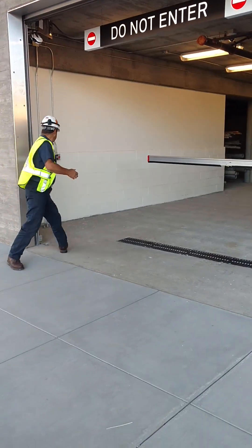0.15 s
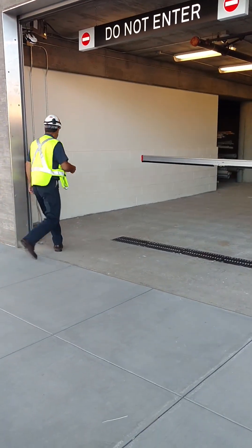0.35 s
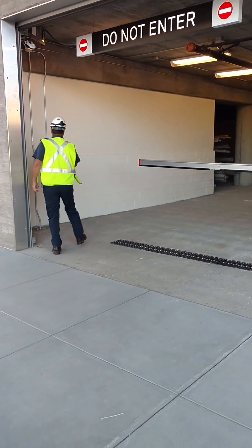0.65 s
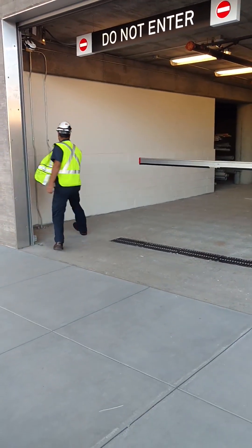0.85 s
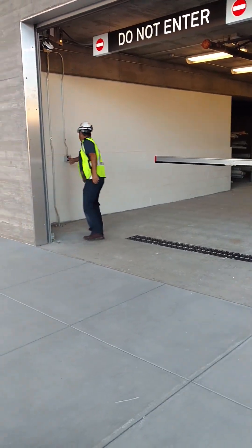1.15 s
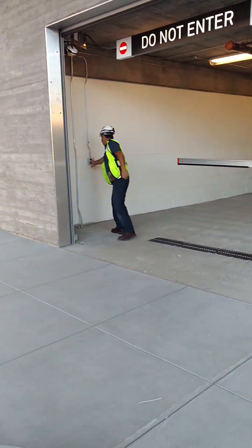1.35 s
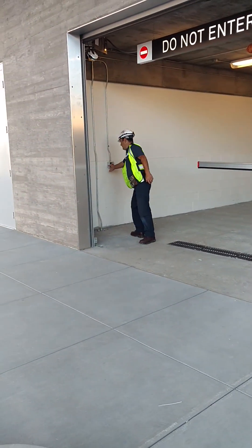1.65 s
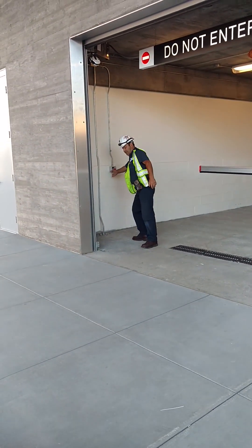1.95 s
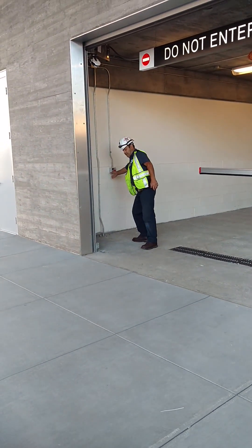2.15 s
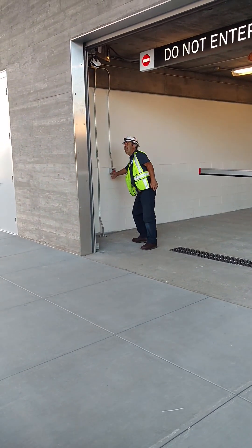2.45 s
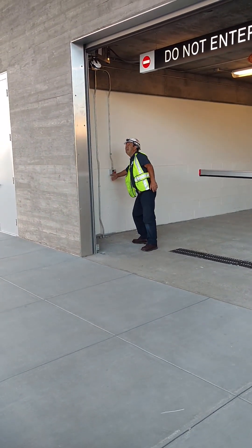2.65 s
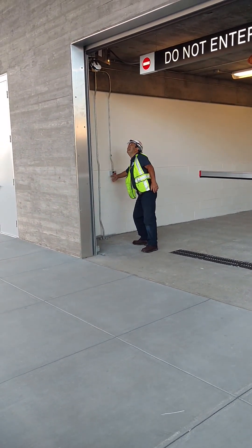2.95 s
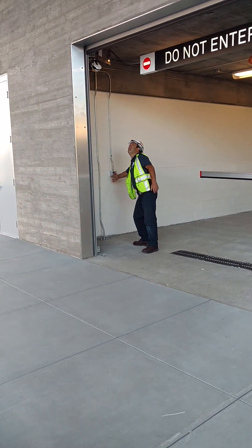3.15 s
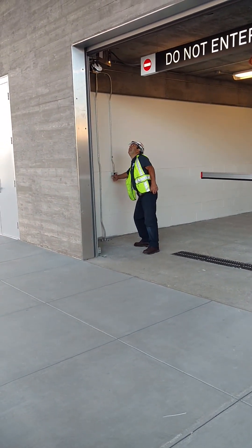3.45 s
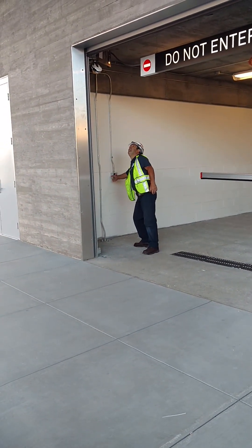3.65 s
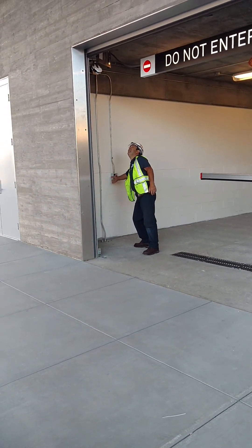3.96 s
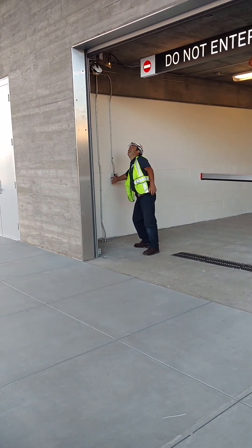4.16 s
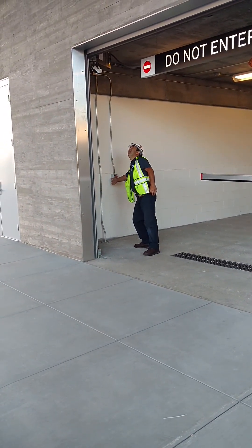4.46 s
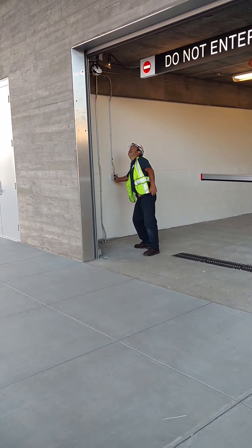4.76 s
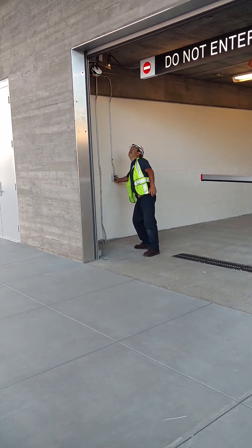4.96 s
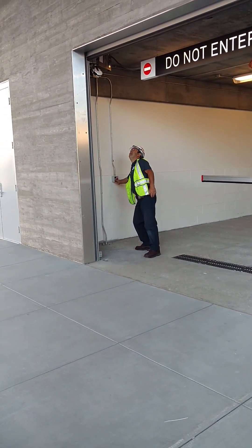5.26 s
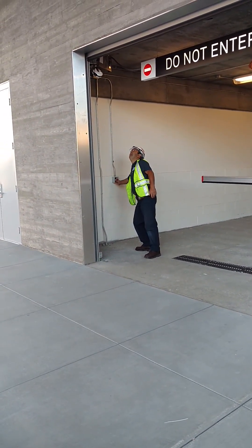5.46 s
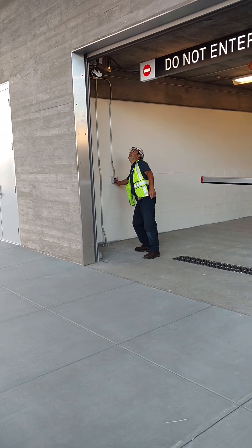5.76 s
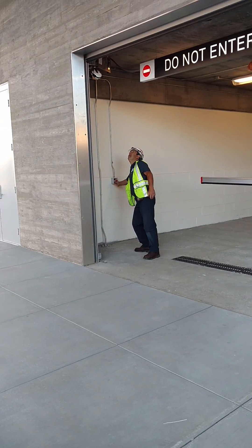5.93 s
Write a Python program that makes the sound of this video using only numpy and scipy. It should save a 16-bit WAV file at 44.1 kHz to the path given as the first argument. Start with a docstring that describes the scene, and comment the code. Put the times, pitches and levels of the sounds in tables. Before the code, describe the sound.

Continuous motor hum and dull rushing roar fill a hard-walled garage entrance. A few light ticks of air give way to a loud run of hissing puffs, clinking steel and uneven knocks, plus faint squeaks. The drone holds alone briefly, then one abrupt clack with quick clattering and a burst of air. A buzzy engine tone rises near the end. Wide stereo pickup; the background dips after loud bursts.

```python
"""At the mouth of a concrete garage a motor hums steadily over the broad roar of machinery, and a second engine
wanders in speed. Air hisses out in sharp bursts, metal knocks, clinks and squeals thinly.
Motor and engine are sums of harmonics, roar and air are shaped noise, struck metal rings in decaying modes and
squeals are noise through narrow resonances. Two close capsules are steered into a wide pair."""
import sys
import numpy as np
from scipy import signal
from scipy.fft import rfft, irfft
from scipy.io import wavfile
from scipy.ndimage import uniform_filter1d

SR = 44100
rng = np.random.default_rng(int(sys.argv[2]) if len(sys.argv) > 2 else 0)


def magnitude_from_level(level_db):
    """Linear magnitude for a level in decibels (20 dB per decade)."""
    exponent = np.asarray(level_db, float) / 20
    return 10 ** exponent


def put_to_file(sound):
    """Save the sound as 16-bit audio at rate SR, in the file named by the first command-line argument."""
    columns = np.atleast_2d(sound).T  # one column per channel
    safe = np.clip(columns, -1, 1)
    whole_steps = np.round(safe * 32767)
    wavfile.write(sys.argv[1], SR, whole_steps.astype(np.int16))


N = 268682
T = np.arange(N) / SR   # time [s]
HZ = np.maximum(np.arange(N // 2 + 1) * SR / N, 10)   # pitch of each spectral bin, floored for the log axis
MOTOR_TURN_HZ = 15.165
# difference of the two capsules in a reverberant field: (frequency [Hz], side over mid [dB])
CAPSULE_SIDE = [(60, -32), (125, -30), (250, -25), (350, -11), (520, -12), (1000, -11), (1600, 0),
                (2500, 0), (16000, -2.5)]


def rms_one(x):
    """Normalise the mean power: scale to rms 1."""
    return x / np.sqrt(np.mean(x ** 2) + 1e-20)


def in_time(rows):
    """Linear interpolation: the columns of a time curve at every sample."""
    s, *columns = np.transpose(rows)
    return [np.interp(T, s, c) for c in columns]


def at_hz(points, hz):
    """Interpolation on a logarithmic frequency axis."""
    freqs, levels = np.array(points).T
    return np.interp(np.log(hz), np.log(freqs), levels)


def drift(rate_hz):
    """Low-pass random process: noise through two equal poles at rate_hz, with spread 1."""
    hop = 40   # computed at every 40th sample
    r = np.exp(-2 * np.pi * rate_hz * hop / SR)
    settle = 2000
    white = rng.standard_normal(N // hop + settle + 2)
    slow = rms_one(signal.lfilter([1], [1, -2 * r, r * r], white)[settle:])
    return np.interp(np.arange(N) / hop, np.arange(len(slow)), slow)


def coloured(spectrum):
    """Spectral shaping: two uncorrelated noises, mid and side, of one colour."""
    white = rfft(rng.standard_normal((2, N)))
    return rms_one(irfft(white * magnitude_from_level(at_hz(spectrum, HZ)), N))


def tone(hz, waver_db):
    """Interference of reflections: a sine wavers in phase and level, with unrelated phases in mid and side."""
    shake_rad = 0.0012 * hz * drift(3.26)   # grows with pitch
    phase = 2 * np.pi * (np.cumsum(hz + 0 * T) / SR + rng.random((2, 1))) + shake_rad
    return np.sqrt(2) * np.sin(phase) * magnitude_from_level(waver_db * drift(2.04))


def motor(roar_db):
    """Harmonics of steady rotation, with a fan tone, ride with the roar; the deep hum falls away for a while."""
    # steady multiples of the turning rate: (multiple), and their (level over the roar [dB])
    multiples, multiple_db = [9, 12, 13, 15, 17, 19, 24, 25, 26, 42, 46, 51, 109], [-17.5, -23, -19.5, -14, -16, -15, -25.5, -21, -21, -23,
                                                    -16, -35, -22]
    # gear tones that come and go: (time [s], 45th, 48th and 27th multiple over the roar [dB])
    gear_tones = [(0, -8, -11, -17), (.15, -20, -13, -11.5), (.6, -6.5, -9.5, -14), (.9, -25, -21, -10),
                  (1.6, -10, -19, -22), (1.95, -14, -32, -26), (2.55, -15.5, -7.5, -20),
                  (2.85, -24, -16, -14), (3.5, -13.5, -30, -19), (4.1, -8.5, -14, -23),
                  (4.6, -20, -18, -20), (6.09, -14.5, -18, -15)]
    # fan tone: (time [s], level over the roar [dB])
    fan_level = [(0, -6.5), (.7, -10), (1.1, -6), (1.65, -12.5), (2.2, -10), (3.3, -14), (4.1, -13),
                 (6.09, -10.5)]
    hum = 0
    for k, db in zip(multiples, multiple_db):
        hum = hum + magnitude_from_level(db) * tone(k * MOTOR_TURN_HZ, waver_db=3.5)
    for k, db in zip([45, 48, 27], in_time(gear_tones)):
        hum = hum + magnitude_from_level(db) * tone(k * MOTOR_TURN_HZ, waver_db=0)
    fade_s = 0.37
    fall = np.clip((T - 4.23) / fade_s, 0, 1)
    back = np.clip((T - 6.1) / fade_s, 0, 1)
    deep_db = -38.5 - 14 * (fall - back)
    deep = magnitude_from_level(deep_db) * tone(6 * MOTOR_TURN_HZ, waver_db=1.5)
    fan = magnitude_from_level(*in_time(fan_level)) * tone(263.6, waver_db=2.5)
    return magnitude_from_level(roar_db) * (hum + fan) + deep


def engine():
    """Harmonics of a varying firing rate: three multiples glide together and grow with the load."""
    # wandering speed: (time [s], firing rate [Hz])
    speed = [(0, 66), (.5, 65), (1, 63.1), (1.5, 62.4), (1.8, 61.8), (2.3, 61.5), (2.75, 56.5), (3.1, 57.5),
             (3.6, 59.2), (4.1, 64), (4.6, 68.1), (5.92, 68.4), (6.09, 71)]
    # load: (time [s], change at full share [dB])
    load = [(0, 0.5), (.6, -1), (1.1, -11), (1.5, 5), (1.9, 4.5), (2.9, -8.5), (3.55, 6), (3.85, -12),
            (4.45, -16), (4.75, 8), (5.08, 3), (5.3, 7.5), (5.85, 7.5), (6.09, -5)]
    # firing tone, 4th and 9th multiple: (level at zero load [dB]), and (share of the load shown, 0-1)
    base_db, load_share = [-49, -37.5, -40.5], [0.048, 0.29, 1]
    firing_hz, = in_time(speed)
    load_db, = in_time(load)
    swell_db = [np.interp(T, [3.7, 4.5], [0, 9]), 0, 0]   # the firing tone swells and stays
    out = 0
    for k, db, share, more_db in zip([1, 4, 9], base_db, load_share, swell_db):
        out = out + magnitude_from_level(db + share * load_db + more_db) * tone(k * firing_hz, waver_db=0.85)
    return out


def bursts():
    """Turbulent jet noise: each burst sputters, sets in sharply and decays exponentially in the concrete."""
    # bursts of air: (time [s], nominal peak [dB], lowest frequency [Hz], rise [s], decay by 60 dB [s])
    puffs = [(0.132, -33, 7050, .001, 0.69), (.1325, -35, 5800, .0005, .07), (.134, -29, 12800, .001, 0.1),
             (.226, -24, 12800, .004, .1), (.515, -40, 10500, 0.012, 0.48),
             (1.393, -26, 3420, 0.0022, 0.13), (1.653, -21, 4700, 0.0018, 0.33),
             (1.66, -17.5, 2600, 0.038, 1.1), (1.748, -14.5, 1690, 0.0026, 1.17),
             (1.793, -13, 2580, 0.005, 0.086), (1.962, -18.5, 2500, 0.026, 0.76),
             (2.07, -26, 4900, 0.018, 0.13), (2.165, -38, 6030, 0.0086, 0.057),
             (2.371, -25, 3480, .002, 0.22), (2.425, -30, 5900, 0.031, 1.5),
             (2.553, -27, 11000, .001, 0.05), (2.6, -32.5, 5000, 0.015, 1), (3.337, -38, 8000, .003, 0.3),
             (4.18, -37, 9000, 0.018, 0.34), (4.2627, -15, 4500, .0005, 0.098),
             (4.2627, -18, 11500, .0005, 0.067), (4.272, -18, 7500, .0005, 0.06),
             (4.2725, -14.5, 900, .0005, 0.37), (4.314, -17, 800, 0.023, 0.57),
             (4.32, -21, 10400, 0.028, 0.45), (4.76, -33, 11000, .002, 0.26),
             (4.75, -28.5, 4400, 0.013, 0.59)]
    # colour of the jet before the nozzle: (frequency [Hz], relative density [dB])
    air = [(700, -5), (1200, 14), (2000, 9.5), (3200, 5), (4500, 2.5), (6500, -2), (8000, -16.5),
           (10000, -15), (12500, -31.5), (14500, -33.5)]
    nozzle_bright = 0.43   # how far the nozzle lifts the treble, 0-1
    sputter = magnitude_from_level(0.6 * drift(30) + 2.2 * drift(700))
    jet = signal.lfilter(np.poly([nozzle_bright] * 3), [1], coloured(air) * sputter)
    out = np.zeros((2, N))
    for s, peak_db, low_hz, rise, t60 in puffs:
        i = round(s * SR)
        t = T[:min(N - i, SR)]
        shape = np.minimum(t / rise, 1) * magnitude_from_level(-60 * t / t60)
        cut = signal.butter(5, low_hz, "high", fs=SR, output="sos")
        puff = signal.sosfilt(cut, jet[:, i:i + len(t)])
        out[:, i:i + len(t)] += magnitude_from_level(peak_db) * shape * rms_one(puff) / 3   # noise peaks at about thrice its rms
    return out


def knocks():
    """Modal excitation: a contact of some milliseconds lets every mode swell, with fresh strength and phase."""
    # blows: (time [s], relative level [dB], weight of the low modes [dB], pitch ratio by the place struck [-])
    blows = [(1.716, -8.5, -21, 1.2), (1.803, -11, -23, 1.2), (1.916, 0, -18, 1), (2.076, -6.5, -10, 0.9),
             (2.209, -2.5, -11, 0.75), (2.222, -6, -7, 0.95), (2.37, -4.5, -27, 0.98),
             (2.72, -22.5, 8, 1.3), (2.805, -11, -32, 1.14), (4.269, -4, -3.5, 1.03), (4.292, -16, 2, 1.3),
             (4.319, -7, 3, 1), (4.335, -9, -1, 1.03), (4.349, -7.5, -1.5, 1.3), (4.37, -3, -1.5, .95),
             (4.398, -13, 6.5, 1.2)]
    # modes of the metal: (frequency at ratio 1 [Hz], relative level [dB], decay by 60 dB [s])
    modes = [(290, -3, .12), (430, -5, .1), (830, -8, .04), (1040, -1, .025), (1190, -7, .03),
             (1350, -10, .04), (1620, -14, .03), (1950, -10, .025)]
    contact = np.hanning(400)
    out = np.zeros((2, N))
    for hz, mode_db, t60 in modes:
        r = magnitude_from_level(-60 / (t60 * SR))
        for (s, db, low_db, pitch), (chance, *turns) in zip(blows, rng.random((len(blows), 3))):
            i = round(s * SR)
            w = 2 * np.pi * hz * pitch / SR
            start_phase = 2 * np.pi * np.array(turns)[:, None]
            swing = np.cos(w * np.arange(len(contact)) + start_phase)
            gain = magnitude_from_level(db + mode_db + low_db * (hz < 500) + 2.3 * (chance - 3.5))
            push = np.zeros((2, SR // 4))
            push[:, :len(contact)] = gain * 2 * contact / contact.sum() * swing
            out[:, i:i + SR // 4] += signal.lfilter([0, np.sin(w)], [1, -2 * r * np.cos(w), r * r], push)
    return out


def clinks():
    """Modal resonance: a few milliseconds of chatter ring the high modes of a small steel part."""
    # clinks: (time [s], strength of the chatter [dB])
    strikes = [(1.656, -21), (1.667, -29), (1.679, -27.5), (1.695, -25), (1.707, -25), (4.2722, -29)]
    # modes of the part: (frequency [Hz], relative level [dB], decay by 60 dB [s])
    modes = [(4700, -7, 0.062), (6700, -7, 0.063), (7500, -9, .04), (9160, -12, 0.055),
             (11550, -11.5, 0.046)]
    chatter, out = np.zeros((2, N)), 0
    for s, db in strikes:
        i, grit = round(s * SR), rng.standard_normal((2, 200))
        chatter[:, i:i + 200] += magnitude_from_level(db) * grit / 10
    for hz, db, t60 in modes:
        r, w = magnitude_from_level(-60 / (t60 * SR)), 2 * np.pi * hz / SR
        out = out + magnitude_from_level(db) * signal.lfilter([0, np.sin(w)], [1, -2 * r * np.cos(w), r * r], chatter)
    return out


def squeals():
    """Resonant filtering: stuttering friction noise passes twice through a narrow resonance."""
    # squeals and whistling hiss: (start [s], end [s], frequency [Hz], width of one pass [Hz], level [dB])
    cries = [(1.035, 1.284, 2140, 981.5, -36), (1.649, 1.83, 6600, 2268, -31),
             (1.757, 1.768, 6500, 620, -35), (1.804, 1.809, 4200, 700, -25), (2.348, 2.497, 9330, 420, -52),
             (2.555, 2.974, 2750, 350, -42), (2.555, 2.753, 3600, 350, -44.5), (2.594, 2.8, 9600, 400, -56),
             (2.925, 3.01, 9800, 432, -51.5), (3.352, 3.385, 9670, 400, -51),
             (4.19, 4.314, 6130, 200, -39.5), (4.733, 5.857, 6580, 518.4, -53.5),
             (5.165, 5.712, 7050, 1700, -50.5)]
    out, white = 0, rng.standard_normal((2, N))
    for start, end, hz, width_hz, db in cries:
        r = np.exp(-np.pi * width_hz / SR)
        resonance = [1, 0, -1, 1, -2 * r * np.cos(2 * np.pi * hz / SR), r * r]
        length = end - start
        fade_in = np.clip((T - start) / (0.055 * length), 0, 1)
        fade_out = np.clip((end - T) / (0.21 * length), 0, 1)
        stutter = magnitude_from_level(3.2 * drift(35))
        ringing = rms_one(signal.sosfilt([resonance, resonance], white))
        out = out + magnitude_from_level(db) * fade_in * fade_out * stutter * ringing
    return out


def roar():
    """Amplitude modulation: broad noise throbs with every turn of the motor; now and then its bass swells."""
    # colour: (frequency [Hz], relative density [dB])
    colour = [(45, -26.5), (70, -18), (120, -3.5), (200, -1.5), (270, 2), (400, -5.5), (650, -2.5),
              (1000, -5), (1600, -9), (2500, -15), (4000, -23), (6500, -29), (9000, -39.5), (12000, -51),
              (15000, -54)]
    # the bass builds up, then drops back: (time of the top [s], swell [dB], build-up [s])
    swells = [(1.6, 3.5, .8), (5.9, 5.5, 0.31)]
    turn = 2 * np.pi * MOTOR_TURN_HZ * T
    throb = 1 + 0.036 * np.sin(turn) + 0.021 * np.sin(3 * turn)
    spectrum = rfft(coloured(colour))
    bass = irfft(spectrum / (1 + (HZ / 380) ** 4), N)
    drop_s = 0.12
    bass_db = sum(np.interp(T, [s - rise, s, s + drop_s], [0, db, 0]) for s, db, rise in swells)
    return (irfft(spectrum, N) + bass * (magnitude_from_level(bass_db) - 1)) * throb * magnitude_from_level(0.5 * drift(6))


def scene():
    """Superposition: all sources add as mid and side of the field, then are dealt to the two capsules."""
    # slow swell of the roar: (time [s], level [dB])
    roar_level = [(0.0, -25), (0.6, -25), (0.8, -27), (1.6, -25), (3.0, -25), (4.2, -24), (5.0, -25.5),
                  (5.9, -26), (6.09, -29)]
    roar_db, = in_time(roar_level)
    field = magnitude_from_level(roar_db) * roar() + motor(roar_db) + engine() + bursts() + knocks() + clinks() + squeals()
    mid, side = rfft(field)
    # the deep hum comes along the line of the capsules, so one hears it later and weaker or stronger
    bass_lag_s, bass_tilt, bass_top_hz = 0.00016, 0.048, 124
    along = (bass_tilt - 1j * np.pi * HZ * bass_lag_s) / (1 + (HZ / bass_top_hz) ** 4)
    side = side * magnitude_from_level(at_hz(CAPSULE_SIDE, HZ)) + along * mid
    return irfft(np.array([mid + side, mid - side]), N)


def steer(pair):
    """Delay-and-subtract directivity: each side subtracts the other capsule; an equaliser restores the bass."""
    # unequal colour of the sides by the housing: (frequency [Hz], left over right [dB])
    balance = [(60, -6.5), (600, 1), (1400, 0), (2200, -2.5), (3500, 2), (7000, 0.5), (9600, 5),
               (11000, 0.5), (15000, 3)]
    gain, delay_samples = 0.72, 17
    lean = 0.12   # the right side subtracts a little more, the left a little less
    late = gain * np.exp(-2j * np.pi * HZ * delay_samples / SR)
    left, right = rfft(pair)
    wide = np.array([left - (1 - lean) * late * right, right - (1 + lean) * late * left])
    power = np.abs(1 - late) ** 2 + np.abs(1 + late) ** 2 * magnitude_from_level(2 * at_hz(CAPSULE_SIDE, HZ))
    housing = magnitude_from_level(at_hz(balance, HZ) * [[0.5], [-0.5]])
    treble_cut = 1 / (1 + (HZ / 14300) ** 60)
    return irfft(wide * housing * treble_cut / np.sqrt(power), N)


def gain_control(x):
    """Feed-forward compression: loud treble pulls the gain down quickly; it creeps back at a steady rate."""
    hears_above_hz, window_s = 1390, 0.047
    knee_db, share, release_db_per_s, attack_s = -33, 0.48, 8.5, 0.12
    bass_hz, bass_more = 464, 0.73   # below this pitch the gain is pulled further, by this share
    heard = signal.sosfilt(signal.butter(2, hears_above_hz, "high", fs=SR, output="sos"), x)
    power = uniform_filter1d(np.mean(heard ** 2, axis=0), size=int(window_s * SR))
    pull_db = share * np.maximum(10 * np.log10(power + 1e-12) - knee_db, 0)
    # a running maximum on a rising ramp holds each pull and releases it linearly
    ramp_db = release_db_per_s * T
    held_db = np.maximum.accumulate(pull_db + ramp_db) - ramp_db
    r = np.exp(-1 / (attack_s * SR))
    gain_db = -signal.lfilter([1 - r], [1, -r], held_db)
    bass = signal.sosfilt(signal.butter(1, bass_hz, fs=SR, output="sos"), x)
    return magnitude_from_level(gain_db) * (x + bass * (magnitude_from_level(bass_more * gain_db) - 1))


def top_cut(x):
    """Nothing passes above the cut-off."""
    return signal.sosfilt(signal.butter(12, 15880, fs=SR, output="sos"), x)


def record(dry):
    """Signal chain in series: the capsules are steered into a wide pair, then gain control follows."""
    mix = gain_control(steer(dry))
    return top_cut(mix)


dry = scene()
out = record(dry)
put_to_file(out)
```